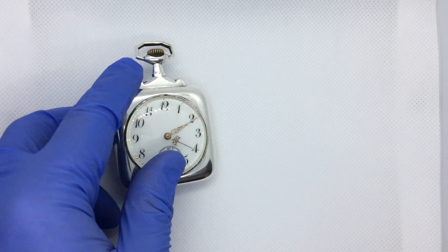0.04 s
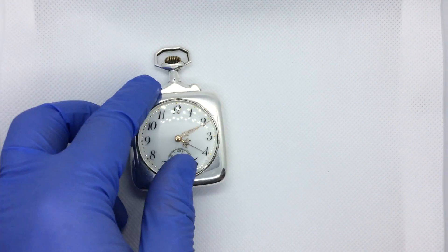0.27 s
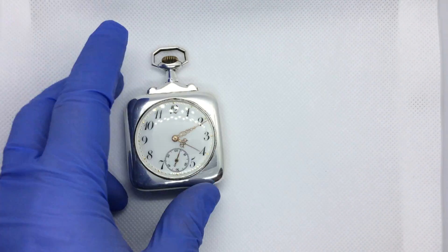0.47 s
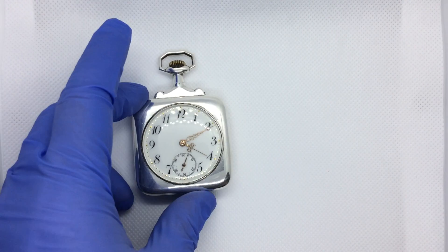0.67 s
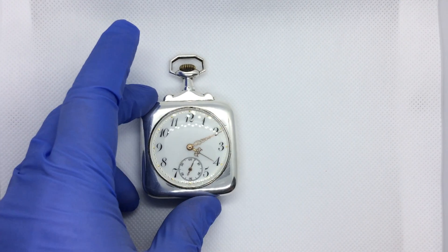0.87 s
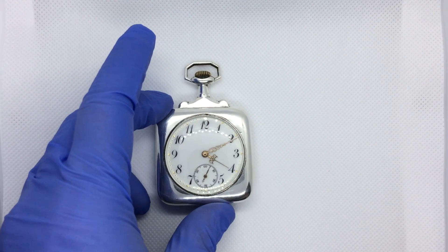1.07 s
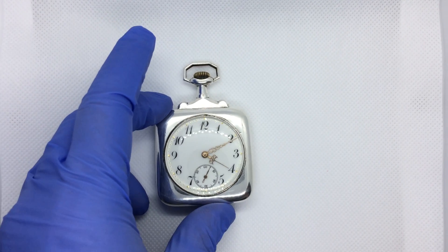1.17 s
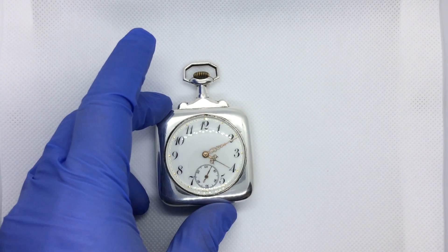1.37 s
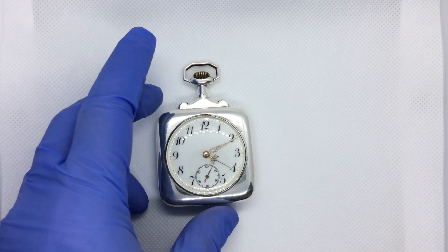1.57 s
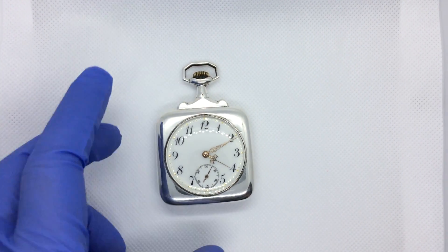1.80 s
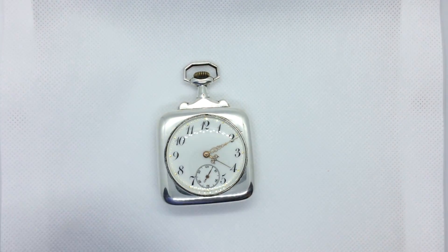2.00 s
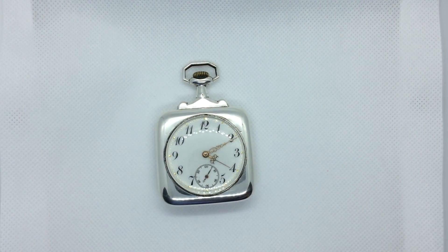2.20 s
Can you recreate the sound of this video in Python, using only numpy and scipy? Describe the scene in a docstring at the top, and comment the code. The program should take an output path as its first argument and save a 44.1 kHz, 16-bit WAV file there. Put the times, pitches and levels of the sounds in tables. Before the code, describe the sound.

A small watch's quick, thin ticks in a humming room, with a cushioned thump and glove rustles

```python
"""Throughout, a quiet room hums: filtered noise, fuzzy tones and a thin, wavering whine.
From the start a pocket watch ticks five times a second: runs of steel contacts ring its case modes.
The watch is then set down on a cloth-covered table with a soft double thud: cushioned blows ring table modes.
A rubber glove slides off the case with a small snap: grainy noise, then a decaying noise burst.
It shifts on the cloth afterwards: smooth strokes of dull noise, some of which also come before."""
import sys
import numpy as np
from scipy import signal
from scipy.fft import rfft, irfft
from scipy.io import wavfile

SR = 44100
rng = np.random.default_rng(int(sys.argv[2]) if len(sys.argv) > 2 else 0)


def to_wav(s):
    """Save 16-bit WAV."""
    ch = np.atleast_2d(s).T  # columns
    pcm = np.round(np.clip(ch, -1, 1) * 32767)  # PCM
    wavfile.write(sys.argv[1], SR, pcm.astype(np.int16))


N = 99225  # samples in the scene


def amp(db):
    """Logarithmic level: decibels to amplitude ratio."""
    return 10 ** (np.asarray(db) / 20)


def unit(x):
    """Normalisation by mean power: scales to rms 1."""
    return x / np.sqrt(np.mean(x ** 2) + 1e-20)


def add(mix, s, sound):
    """Superposition: sums a sound into the mix at s seconds, cropped to fit."""
    at = round(s * SR)
    part, sound = mix[max(at, 0):], sound[max(-at, 0):]
    part[:len(sound)] += sound[:len(part)]


def noise(colour, size, tilt_db=0):
    """Spectral shaping: white noise weighted by a colour curve and a tilt in dB per octave, at rms 1."""
    octave = np.log2(np.fft.rfftfreq(size, 1 / SR) + 1)
    hz, db = np.transpose(colour)
    gain = amp(np.interp(octave, np.log2(hz), db) + tilt_db * octave)
    spectrum = rfft(rng.standard_normal(size))
    return unit(irfft(spectrum * gain * (octave > 0), size))  # the zero-frequency bin is silenced


def resonant_noise(centre_hz, width_hz):
    """Resonance: white noise whose amplitude is halved one width away from the centre, at rms 1."""
    offset = (np.fft.rfftfreq(N, 1 / SR) - centre_hz) / width_hz
    return unit(irfft(rfft(rng.standard_normal(N)) / (1 + offset ** 2), N))


def drift(hz):
    """Low-pass random modulation: wandering mostly slower than the given rate, at rms 1."""
    return resonant_noise(0, hz)


def decay(t, t60):
    """Exponential damping: falls 60 dB in t60 seconds."""
    return np.exp(-np.log(1000) * t / t60)


def swell(length):
    """Half-sine envelope: a stroke that rises and falls smoothly over length seconds."""
    return np.sin(np.pi * np.arange(0, length, 1 / SR) / length)


# spectrum of the room's air noise [f/Hz, relative level/dB per Hz]
AIR_COLOUR = [(20, -20), (45, -10), (72, 2), (100, -11), (138, 1.5), (200, -6.5), (300, -3), (440, -12),
              (590, -12), (750, -17), (1030, -10.5), (1270, -17.5), (1500, -16), (1820, -12), (2040, -22.5),
              (2200, -16), (2500, -17.5), (3300, -25.5), (7500, -34.5), (16000, -41)]
AIR_DB = -58.5


def air():
    """Stationary broadband noise: the steady background of the room."""
    return amp(AIR_DB) * noise(AIR_COLOUR, N)


# fuzzy tones of the room's hum [f/Hz, width/Hz, level/dB]
HUM_TONES = [(295, 58, -73.5), (507.6, 28, -68), (895, 53, -69)]


def hum():
    """Narrow-band noise: each tone is random energy gathered around a centre frequency."""
    return sum(amp(db) * resonant_noise(hz, width_hz) for hz, width_hz, db in HUM_TONES)


# level curve of the thin whine, weaker by the end [t/s, level/dB]
WHINE_LEVELS = [(0, -70), (.65, -70), (.85, -75), (1.3, -73.5), (2.25, -82.5)]
WHINE_HZ, WHINE_WAVER_HZ = 1554, 3.05  # centre, rms deviation


def whine():
    """Frequency modulation: a sine whose phase integrates a randomly wavering frequency."""
    hz = WHINE_HZ + WHINE_WAVER_HZ * drift(hz=12.7)
    tone = unit(np.sin(2 * np.pi * np.cumsum(hz) / SR))
    level_db = np.interp(np.arange(N) / SR, *np.transpose(WHINE_LEVELS))
    return tone * amp(level_db)


# shifts of the hand on the table [start t/s, length/s, level/dB, tilt/dB per octave]
HAND_SHIFTS = [(-.01, 0.042, -48.5, -2), (0.028, 0.28, -56, 3), (0.332, 0.11, -47.5, -7),
               (0.438, .12, -58.5, 7), (.78, 0.082, -56, 3), (0.901, 0.24, -50.5, 1),
               (1.097, 0.25, -61.5, -1)]
# spectrum of the shifting [f/Hz, relative level/dB]
HAND_SHIFT_COLOUR = [(20, -29), (34, -12), (55, 10), (90, -1), (150, 1.5), (230, -16.5), (310, -1.5),
                     (450, -14), (900, -20.5), (3000, -44), (16000, -61.5)]


def hand_shifts():
    """Friction through a soft layer: smooth strokes of dull noise."""
    out = np.zeros(N)
    for start, length, db, tilt_db in HAND_SHIFTS:
        stroke = swell(length)
        rumble = unit(noise(HAND_SHIFT_COLOUR, N, tilt_db)[:len(stroke)])
        add(out, start, amp(db) * stroke * rumble)
    return out


# rubs of glove and cloth [start t/s, length/s, level/dB, tilt/dB per octave, rasp level re hiss/dB]
GLOVE_RUBS = [(-.03, 0.16, -68.5, -0.5, -18), (0.227, 0.031, -50.5, -3, -15),
              (0.241, 0.051, -51.5, -3.5, -25), (0.443, 0.093, -62.5, 1, 0), (0.492, 0.066, -68.5, 0, 6),
              (0.509, 0.15, -70.5, 5, -8), (0.897, .24, -67.5, 0, -10), (1.71, .06, -70, -4, -0.5)]
# spectrum of the rubbing hiss [f/Hz, relative level/dB]
RUB_HISS_COLOUR = [(500, -10), (2000, -4.5), (4200, -2.5), (6000, -8.5), (8500, -7.5), (11000, -13.5),
                   (16000, -15)]
# spectrum of rubber catching on the weave [f/Hz, relative level/dB]
RASP_COLOUR = [(3000, -40), (5000, -9), (5800, 3), (6900, -2), (7800, -8), (12000, -13)]
RUB_GRAIN_DB, RUB_GRAIN_HZ = 3.5, 700  # rms depth and rate of the level's flutter


def glove_rubs():
    """Sliding friction: hiss and rasp whose level flutters at random, giving a grainy stroke."""
    out = np.zeros(N)
    for start, length, db, tilt_db, rasp_db in GLOVE_RUBS:
        stroke = swell(length)
        hiss = noise(RUB_HISS_COLOUR, N, tilt_db)
        rasp = amp(rasp_db) * noise(RASP_COLOUR, N)
        flutter = unit(amp(RUB_GRAIN_DB * drift(RUB_GRAIN_HZ)))
        grains = (hiss + rasp) * flutter
        add(out, start, amp(db) * stroke * grains[:len(stroke)])
    return out


# moments when the glove sticks and lets go [t/s, level/dB]
GLOVE_SNAPS = [(.4382, -58.5), (0.462, -68), (0.5355, -45), (1.0095, -67), (1.8965, -64)]
# spectrum of a snap [f/Hz, relative level/dB]
GLOVE_SNAP_COLOUR = [(1000, -7), (4000, -22), (5900, -14), (7800, -3.5), (9500, -17.5), (16000, -25)]
SNAP_T60, SNAP_RISE_S = 0.022, .0005  # s, s


def glove_snaps():
    """Stick-slip release: a noise burst with a steep onset and exponential damping."""
    out, t = np.zeros(N), np.arange(SR // 10) / SR
    envelope = np.minimum(t / SNAP_RISE_S, 1) * decay(t, SNAP_T60)
    for start, db in GLOVE_SNAPS:
        add(out, start, amp(db) * envelope * noise(GLOVE_SNAP_COLOUR, len(t)))
    return out


# watch and fingers meeting the table and settling [t/s, level/dB, contact time/s, scuff level/dB]
TABLE_BLOWS = [(0.2371, -23.5, 0.0034, -21.5), (0.2418, -18, 0.0051, -31), (0.2544, -20.5, 0.0026, -11.5),
               (0.2603, -13.5, .0028, -25.5), (0.2699, -21.5, 0.0046, -18.5), (0.2798, -21, 0.00436, -42),
               (0.3097, -35, 0.0048, -40), (0.3258, -37, 0.0056, -40)]
# ringing modes of the table [f/Hz, relative level/dB, t60/s]
TABLE_MODES = [(58.6, -0.5, 0.09), (90.7, -7.5, 0.11), (120, -5.5, 0.087), (183, 0.5, 0.04),
               (308, -17.5, 0.078), (403, 2, 0.04), (565, 5.5, 0.039), (890, 3, 0.074)]
# spectrum of the scuffed weave [f/Hz, relative level/dB]
WEAVE_SCUFF_COLOUR = [(200, 4.5), (600, 15), (760, 1.5), (950, 3.5), (1300, -16.5), (1900, 6.5),
                      (2500, -17), (3200, -22.5), (4400, -13.5), (6000, -38), (16000, -34)]
SCUFF_T60 = 0.053  # s
BLOW_RING_DB, BLOW_RING_T60 = -60, .25  # faint ring of the case: dB, s


def set_down():
    """Modal excitation by impact: cloth-cushioned pushes ring the table, scuff the weave and ring the case."""
    out, t = np.zeros(N), np.arange(SR // 2) / SR
    table = sum(amp(db) * decay(t, t60) * np.cos(2 * np.pi * hz * t) for hz, db, t60 in TABLE_MODES)
    case_hz = max(CASE_MODES, key=lambda mode: mode[2])[0]  # the longest-ringing mode
    ring = amp(BLOW_RING_DB) * decay(t, BLOW_RING_T60) * np.sin(2 * np.pi * case_hz * t)
    for start, db, contact, scuff_db in TABLE_BLOWS:
        push = swell(contact) ** 2  # a longer contact dulls the thud
        thud = signal.fftconvolve(table, push / push.sum())[:len(t)]
        scuff = amp(scuff_db) * noise(WEAVE_SCUFF_COLOUR, len(t)) * decay(t, SCUFF_T60)
        onset = np.minimum(t / contact, 1)
        add(out, start, amp(db) * (thud + onset * (scuff + ring)))
    return out


# contacts within one beat: impulse, drop, banking [t from the beat/s, relative level/dB]
BEAT_CONTACTS = [(0, 5), (.0009, -7.5), (.0024, -17), (.004, -7.5)]
# ringing modes of the watch case [f/Hz, relative level/dB, t60/s]
CASE_MODES = [(5350, -18.5, 0.023), (8800, -21, 0.0074), (9210, -14, 0.033), (10280, -10, 0.013),
              (10950, -8, 0.014), (11560, -15, 0.018), (13300, -15, 0.0063), (14000, -13, 0.02),
              (16100, -18, 0.021)]
# spectrum of a contact's click [f/Hz, relative level/dB]
CONTACT_CLICK_COLOUR = [(1500, -32), (4500, -2), (6700, -0.5), (9000, 0.5), (12500, 5.5), (16000, -1)]
CONTACT_JITTER_S, CONTACT_SPREAD_DB = 0.00034, 5.5  # rms
CLICK_DB, CLICK_T60, CONTACT_RISE_S = -5, 0.019, 0.00066  # dB, s, s
BEAT_S = .005  # a tick's level is its energy spread over this time


def beat(t, bright_db):
    """Modal excitation by impact: a quick run of steel contacts that click and ring the case."""
    out = np.zeros(len(t))
    centre_hz = np.mean([mode[0] for mode in CASE_MODES])
    onset = np.minimum(t / CONTACT_RISE_S, 1)
    for lag, contact_db in BEAT_CONTACTS:
        ring = np.zeros(len(t))
        for hz, db, t60 in CASE_MODES:
            mode_db = db + bright_db * np.log2(hz / centre_hz)
            tone = np.sin(2 * np.pi * (hz * t + rng.random()))  # random phase
            ring += amp(mode_db) * decay(t, t60) * tone
        click = amp(CLICK_DB) * noise(CONTACT_CLICK_COLOUR, len(t), bright_db) * decay(t, CLICK_T60)
        late, hard = rng.standard_normal(2)
        gain = amp(contact_db + CONTACT_SPREAD_DB * hard)
        add(out, lag + CONTACT_JITTER_S * late, gain * onset * (ring + click))
    return out * np.sqrt(BEAT_S * SR / np.sum(out ** 2))


# beats of the escapement [t/s, level/dB, brightness/dB per octave]
ESCAPEMENT_BEATS = [(.0741, -56.5, 4), (.2777, -61.5, 3), (0.476, -63, -3), (0.6757, -62.5, -5),
                    (.8747, -61.5, 0.5), (1.0723, -57.5, -4), (1.2732, -60, -5), (1.4726, -59.5, 0),
                    (1.6718, -60.5, -2.5), (1.8706, -56.5, 3.5), (2.0687, -58, 2), (2.2685, -58, 4)]
UNLOCK_LEAD_S, UNLOCK_DB = 0.025, -12  # ahead of the tick, relative to it


def escapement():
    """Intermittent release: the lever unlocks faintly just before each full tick."""
    out, t = np.zeros(N), np.arange(SR // 10) / SR
    for start, db, bright_db in ESCAPEMENT_BEATS:
        add(out, start - UNLOCK_LEAD_S, amp(db + UNLOCK_DB) * beat(t, bright_db))
        add(out, start, amp(db) * beat(t, bright_db))
    return out


def scene():
    """Superposition: room, hand and watch sum at one close microphone."""
    room = air() + hum() + whine()
    glove = hand_shifts() + glove_rubs() + glove_snaps()
    return (room + glove + set_down() + escapement())[None]


LOW_CUT_HZ, EDGE_HZ = 30, 16100


def record(dry):
    """Linear filtering: the microphone's bass roll-off and the recorder's band limit."""
    thinned = signal.lfilter(*signal.butter(1, LOW_CUT_HZ, "high", fs=SR), dry)
    band_limit = signal.firwin(401, EDGE_HZ, window=("kaiser", 8), fs=SR)
    return signal.oaconvolve(thinned, band_limit[None], "same")


dry = scene()
out = record(dry)
to_wav(out)
```